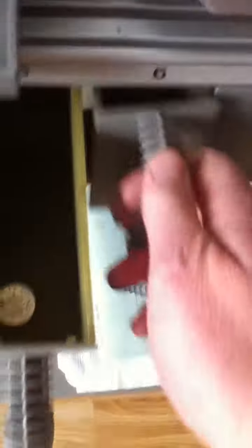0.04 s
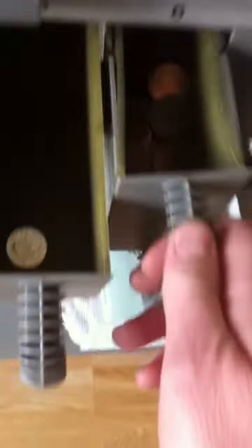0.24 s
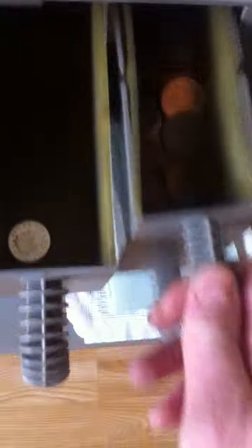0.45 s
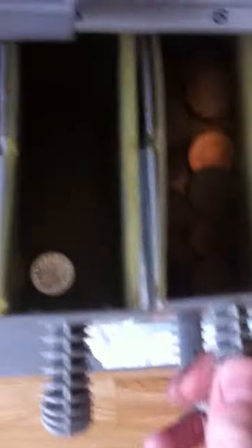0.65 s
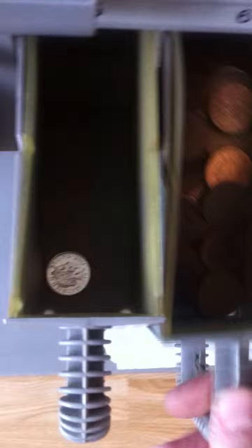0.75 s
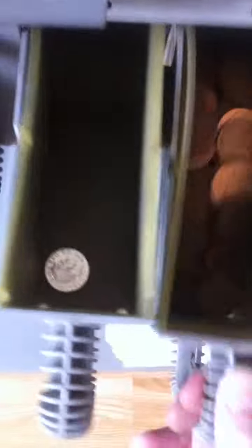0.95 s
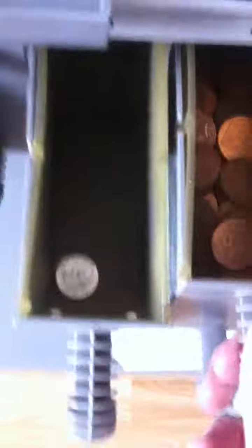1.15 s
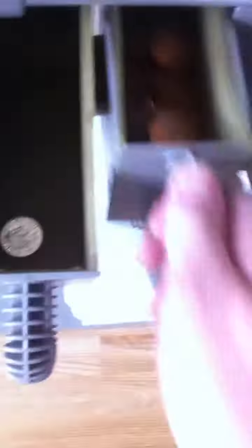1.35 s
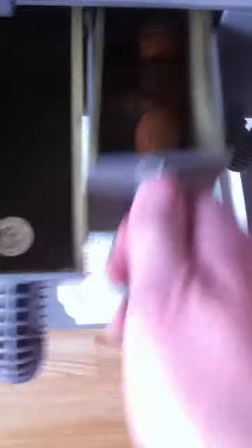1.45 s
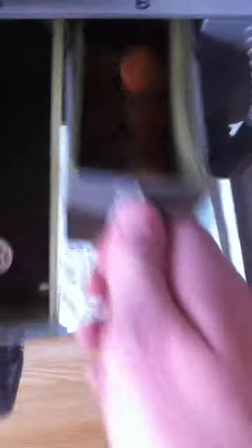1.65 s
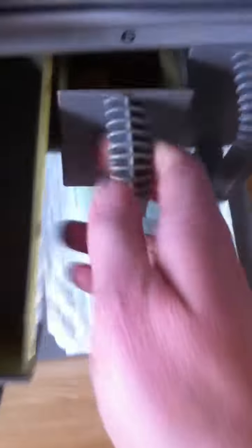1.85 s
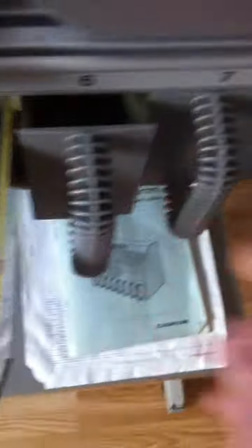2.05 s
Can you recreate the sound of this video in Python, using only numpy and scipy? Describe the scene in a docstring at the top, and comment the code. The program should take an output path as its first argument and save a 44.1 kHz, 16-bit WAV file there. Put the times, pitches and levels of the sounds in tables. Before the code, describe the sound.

Loose coins skid and clink in a sliding metal tray while a small mechanism clacks.

```python
"""In a small room a little mechanism churns throughout, clacking twelve times a second.
A metal coin tray is pulled out by hand: loose coins skid and clink over its floor, it bumps
its housing, and the runner catches with a short shrill stick-slip squeak that lingers in the room.
About a second in, the tray is pushed back with a knock and the coins slide again;
a last cluster of bumps and clinks follows."""
import sys
import numpy as np
from scipy import signal
from scipy.fft import rfft, irfft, next_fast_len
from scipy.io import wavfile
from scipy.ndimage import map_coordinates

SR = 44100
rng = np.random.default_rng(int(sys.argv[2]) if len(sys.argv) > 2 else 0)


def pcm_store(signal):
    """Save signal as 16-bit PCM."""
    levels = np.round(np.clip(np.atleast_2d(signal), -1, 1) * 32767)
    wavfile.write(sys.argv[1], SR, levels.astype(np.int16).T)


N = 92610


def amp(db):
    """Decibels to gain."""
    return 10 ** (np.asarray(db) / 20)


def unit(x):
    """Scale to rms 1."""
    return x / np.sqrt(np.mean(x ** 2) + 1e-20)


def along(points, hz):
    """Read a curve of (f/Hz, value) points on a log frequency axis."""
    f, v = np.transpose(points)
    return np.interp(np.log(hz + 1), np.log(f + 1), v)


def filtered(x, gain):
    """EQ x with a gain that depends on frequency."""
    m = next_fast_len(N + SR // 2)
    return irfft(rfft(x, m) * gain(np.fft.rfftfreq(m, 1 / SR)), m)[:N]


def coloured(x, colour):
    """x through an EQ curve, at rms 1."""
    return unit(filtered(x, lambda hz: amp(along(colour, hz))))


def noise(colour):
    """Fresh noise with the given spectrum."""
    return coloured(rng.standard_normal(N), colour)


def wobble(rate):
    """A smooth random curve, rate knots a second."""
    return map_coordinates(rng.standard_normal(int(N * rate / SR) + 4), [np.arange(N) * rate / SR])


def since(s):
    """Seconds since s, zero before it."""
    return np.maximum(np.arange(N) / SR - s, 0)


def fade(t, t60, rise):
    """A quick attack and an exponential decay, times in seconds."""
    return np.exp(-np.log(1000) * t / t60) * (1 - np.exp(-t / rise))


def ring(hits, modes, rise):
    """Each (t/s, level/dB) hit rings the modes anew, in a slightly different balance."""
    out, t = np.zeros(N + SR), np.arange(SR // 3) / SR
    waves = np.array([amp(db) * fade(t, t60, rise) * np.sin(2 * np.pi * hz * t) for hz, db, t60 in modes])
    for s, db in hits:
        balance_db = 1.5 * rng.standard_normal(len(modes))
        out[max(round(s * SR), 0):][:len(t)] += amp(db + balance_db) @ waves
    return out[:N]


def bursts(hits, colour, t60, rise):
    """A dying puff of noise for each (t/s, level/dB) hit."""
    return noise(colour) * np.sqrt(sum((amp(db) * fade(since(s), t60, rise)) ** 2 for s, db in hits))


def room(x):
    """A small room's reverb tail, dying sooner in the treble."""
    # reverb time: f/Hz, t60/s
    decay = [(200, .3), (2500, .3), (6000, .27), (14000, .16)]
    hz, t, spectrum = signal.stft(rng.standard_normal(SR // 2), SR, nperseg=256)
    spectrum *= np.exp(-np.log(1000) * t / along(decay, hz)[:, None])
    tail = signal.istft(spectrum, SR, nperseg=256)[1]
    return signal.fftconvolve(x, tail / np.linalg.norm(tail))[:N]


def mechanism():
    """Each turn gives a clack with a low thump and a softer return stroke, over a steady churn."""
    # main strokes, and the odd return that catches with a sharper clack: t/s, level/dB
    strokes = [(.031, -26), (.116, -25.5), (.198, -36), (.281, -26.5), (.365, -24.5), (.446, -24.5),
               (0.5298, -25.5), (0.613, -29), (0.6963, -27), (.780, -27), (.861, -25.5), (0.943, -28),
               (1.027, -29.5), (1.111, -27), (1.193, -23.5), (1.275, -27), (1.358, -28.5), (1.442, -27.5),
               (1.524, -27.5), (1.609, -27.5), (1.690, -27.5), (1.773, -26.5), (1.857, -29.5),
               (1.9385, -26.5), (2.021, -26)]
    catches = [(.413, -25), (.833, -29.5), (.995, -37), (1.321, -35), (1.4025, -25), (1.473, -27),
               (1.566, -34), (2.061, -49)]
    # noise EQ of the main stroke, the return and the churn: f/Hz, level/dB
    beat_colour = [(150, -32), (350, -4.5), (700, -7), (1000, -6.5), (1250, 3.5), (1500, -1), (1850, -1),
                   (2100, -13), (3500, -10.5), (7000, -17.5), (15000, -26.5)]
    return_colour = [(150, -16), (600, -3), (1000, 12), (1250, -6.5), (1850, 2.5), (2200, -10),
                     (7000, -15.5), (15000, -27)]
    churn_colour = [(25, -30), (80, -55), (120, -10.5), (160, -11.5), (200, 4.5), (350, -2), (420, -5.5),
                    (580, -8), (880, -6.5), (990, 3.5), (1150, -6.5), (1580, -4.5), (1680, -12.5),
                    (1770, 1), (1910, -5.5), (1980, -10.5), (3200, -16), (7000, -26), (15000, -40.5)]
    # midrange and low resonances: f/Hz, level/dB, t60/s
    clack_modes = [(1020, 0, 0.024), (1250, -11.5, 0.022), (1455, -5.5, 0.022), (1812, -2.5, 0.031),
                   (2290, -3, .015)]
    thump_modes = [(185.8, -49, 0.28), (238.7, -34.5, 0.13), (289.4, -37, 0.099), (345.2, -40, 0.2)]
    rise_s, beat_t60_s, return_lag_s, thump_lag_s = .0015, 0.028, 0.0388, 0.0034
    times, stroke_db = np.transpose(strokes)
    beats = amp(-4) * bursts(strokes, beat_colour, beat_t60_s, rise_s)
    return_db = -36.5 + 2.5 * rng.standard_normal(len(times))
    returns = bursts(zip(times + return_lag_s, return_db), return_colour, t60=0.073, rise=rise_s)
    clacks = amp(-3) * ring(strokes, clack_modes, rise=.0008)
    snags = bursts(catches, return_colour, beat_t60_s, rise_s)
    accent_db = 1.2 * (stroke_db - stroke_db.mean())
    thumps = ring(zip(times + thump_lag_s, accent_db), thump_modes, rise=0.0062)
    churn = amp(-41 + 1.2 * wobble(rate=90)) * noise(churn_colour)
    return beats + clacks + returns + snags + thumps + churn


def coins():
    """Coins skid in a stream of tiny contacts that keep them ringing; some collide harder."""
    # skid envelope: t/s, level/dB
    skid = [(0, -54.5), (.165, -106), (.18, -46), (.195, -44.5), (.215, -37), (.25, -37.5), (.32, -57),
            (.42, -63.5), (.47, -46), (.55, -104), (0.911, -55.5), (.96, -46), (1.01, -42.5),
            (1.025, -37.5), (1.075, -37), (1.098, -31), (1.14, -35.5), (1.202, -32), (1.216, -41),
            (1.238, -37), (1.27, -53), (1.34, -65.5), (1.53, -52.5), (1.575, -40.5), (1.635, -45),
            (1.675, -48.5), (1.716, -29.5), (1.745, -35.5), (1.785, -43), (1.867, -44), (1.892, -33),
            (1.915, -47.5), (1.98, -54.5), (2.1, -55.5)]
    # EQ of the skid and of the collision clicks: f/Hz, level/dB
    skid_colour = [(200, -4), (500, 7.5), (1200, -5), (2800, -0.5), (4200, 0), (6000, 3), (8700, 5),
                   (11500, -3.5), (13500, -7), (15500, 0)]
    click_colour = [(500, -27), (3000, -12), (6000, 5), (9000, 7), (11500, 1.5), (15000, 3.5)]
    # coins strike each other and the wall: t/s, click/dB, large coin ring/dB, small coin ring/dB
    clinks = [(.177, -34, -56, -52), (.487, -52, -56, -58), (.506, -35.5, -41, -44),
              (.9525, -29.5, -48, -71), (.982, -29, -40, -65), (1.0, -29, -54, -53),
              (1.021, -26.5, -41, -30), (1.087, -28, -37, -44), (1.097, -18, -38, -32),
              (1.119, -23, -38, -31), (1.168, -21, -32, -26), (1.191, -25, -30, -27),
              (1.224, -17, -33, -26.5), (1.561, -38, -46, -54), (1.649, -38, -37.5, -57),
              (1.698, -36, -35, -52), (1.756, -26, -39, -37), (1.794, -37, -37, -52),
              (1.8201, -31, -33.5, -50), (1.853, -31, -34.5, -54), (1.881, -26, -39, -48),
              (1.89, -26.5, -36, -52), (2.078, -68, -52, -64)]
    # modes of two coin sizes: f/Hz, level/dB, t60/s
    large_coin = [(13000, 4, 0.05), (12560, -3, 0.096), (13040, -2.5, 0.11), (12830, 1.5, 0.069),
                  (13260, -6, 0.064)]
    small_coin = [(8870, -40, 0.2), (8640, -6, .1), (14485, -3, 0.092), (15100, -10, .06),
                  (15360, -21, .06)]
    grains_per_s, grain_spread_db, hiss_db = 2000, 6.5, 4.5
    skid_db = np.interp(np.arange(N) / SR, *np.transpose(skid))
    envelope = amp(skid_db + 1.6 * wobble(rate=110))
    contacts = (rng.random(N) < grains_per_s / SR) * rng.choice([-1, 1], N)
    strength = amp(grain_spread_db * np.minimum(rng.exponential(size=N), 3.5))
    rub = unit(unit(contacts * strength) + amp(hiss_db) * rng.standard_normal(N))
    scrape = envelope * coloured(rub, skid_colour)
    damped = [1, 1, .4]  # a coin lying flat rings more briefly
    body = ring([(0.0024, 0)], np.multiply(large_coin, damped), rise=.0001)
    body += ring([(0, -5)], np.multiply(small_coin, damped), rise=.0001)
    singing = signal.fftconvolve(envelope * rub, body / np.linalg.norm(body))[:N]
    times, click_db, large_db, small_db = np.transpose(clinks)
    clicks = bursts(zip(times, click_db), click_colour, t60=0.019, rise=0.000067)
    rings = jingle(zip(times, large_db), large_coin) + jingle(zip(times, small_db), small_coin)
    out = scrape + amp(-8.5) * singing + clicks + amp(-0.5) * rings
    return out + amp(-10.5) * room(out)


def jingle(hits, modes, detune=.007):
    """No two coins are quite alike: each (t/s, level/dB) hit rings slightly detuned modes."""
    out, t = np.zeros(N + SR), np.arange(SR // 8) / SR
    hz, level, t60 = np.transpose(modes)[:, :, None]
    decays = amp(level) * fade(t, t60, rise=0.00049)
    for s, db in hits:
        detuned = hz * (1 + detune * rng.standard_normal(hz.shape))
        out[round(s * SR):][:len(t)] += amp(db) * np.sum(decays * np.sin(2 * np.pi * detuned * t), axis=0)
    return out[:N]


def knocks():
    """The tray bumps its housing: a few dull modes and a thud; soft contacts lose the upper modes."""
    # bumps: t/s, level/dB, roll-off/Hz
    bumps = [(.199, -24, 1300), (.21, -29, 1090), (.283, -38.5, 2000), (.537, -30.5, 487),
             (1.022, -22.5, 496), (1.085, -30, 680), (1.111, -27.5, 600), (1.192, -51, 805),
             (1.203, -21.5, 630), (1.615, -22.5, 414), (1.645, -28.5, 900), (1.7335, -20, 2130),
             (1.774, -30.5, 1500)]
    # housing modes: f/Hz, level/dB, t60/s
    housing = [(352, -6.5, 0.14), (517, -12.5, 0.13), (646, -6.5, 0.099), (788, -10, 0.12),
               (985, -1, 0.069), (1122, -3.5, 0.042), (1520, 9, 0.026)]
    # thud EQ: f/Hz, level/dB
    thud_colour = [(40, -29), (150, -48), (400, -8), (900, 0), (1600, -10.5), (2500, -8.5), (6000, -21)]
    out, rise_s = np.zeros(N), .0012
    for s, db, rolloff_hz in bumps:
        body = amp(-5.5) * ring([(s, db)], housing, rise_s)
        thud = amp(1) * bursts([(s, db)], thud_colour, t60=0.056, rise=rise_s)
        lowpass = signal.butter(2, rolloff_hz, fs=SR, output="sos")
        out += signal.sosfilt(lowpass, body + thud)
    return out + amp(-12.5) * room(out)


def squeak():
    """The runner sticks and slips; a slower judder roughens the tone, which leaves a ringing tail."""
    # stick-slip chirps: t/s, length/s, f/Hz, level/dB, judder depth (0-1), tilt/dB per overtone
    chirps = [(0.2176, 0.0079, 2512, -14, 0.1, 2.5), (0.2242, 0.0061, 2545, -19, 0.8, -3),
              (0.237, .009, 2646, -16.5, 0.55, -4.5)]
    # harmonics before the tilt, fundamental first: level/dB
    harmonics = [3, 8, 1, -12, -16, -24]
    # the squeak's partials and side tones lingering in the room: f/Hz, level/dB, t60/s
    tail_partials = [(1030, -41, .25), (1459, -38, .3), (1590, -42, .25), (2440, -33, .28),
                     (2506, -34, .28), (2605, -29, .27), (2655, -34, .27), (2746, -34, .27),
                     (3633, -31, .28), (3761, -38, .27), (3998, -38, .25), (4083, -35, .26),
                     (5044, -24, .27), (5200, -33, .24), (5281, -28, .25), (7645, -33, .21),
                     (10140, -40, .15)]
    # rasp EQ: f/Hz, level/dB
    rasp_colour = [(300, -5), (1500, 6), (2300, 2), (3700, 11), (5500, -12), (8500, 2), (9300, -24),
                   (11500, -28), (13300, -5), (15500, -6)]
    out, edge_s = np.zeros(N), 0.0022
    judder_hz = 1022 * (1 + 0.082 * wobble(rate=500))
    judder = np.sin(2 * np.pi * np.cumsum(judder_hz) / SR)
    rasp = 2 * amp(-12) * noise(rasp_colour)
    for s, length, hz, db, depth, tilt_db in chirps:
        t = since(s)
        gate = np.clip(t / edge_s, 0, 1) * np.clip((length - t) / edge_s + .5, 0, 1)
        tone = unit(sum(amp(level + tilt_db * k) * np.cos(2 * np.pi * (k + 1) * hz * t)
                        for k, level in enumerate(harmonics)))
        out += amp(db) * gate * (tone + depth * (tone * judder + rasp))
    onset_s = chirps[0][0]
    tail = ring([(onset_s, 4.5)], tail_partials, rise=0.0027)
    return out + tail + amp(-7.5) * room(out)


def scene():
    """The tray and its coins over the mechanism's bed, close up and in mono."""
    return (squeak() + coins() + knocks() + mechanism())[None]


def record(dry):
    """A brick-wall high cut trims the very top of the mix."""
    top_hz = 15850
    return filtered(dry[0], lambda hz: hz < top_hz)[None]


dry = scene()
out = record(dry)
pcm_store(out)
```